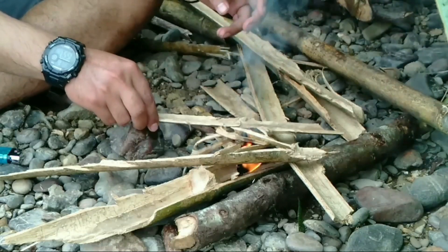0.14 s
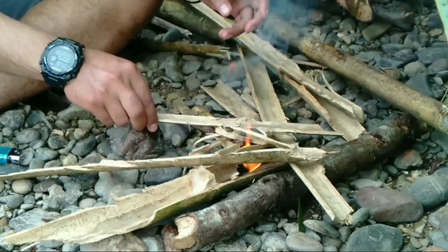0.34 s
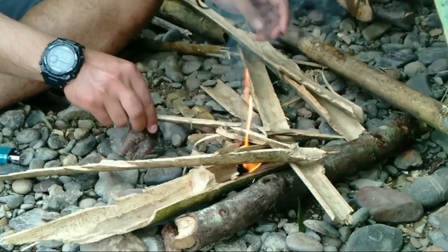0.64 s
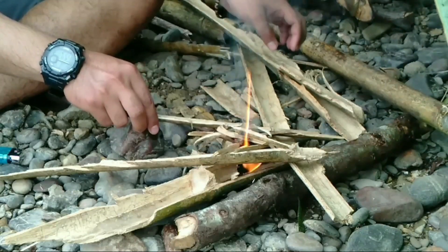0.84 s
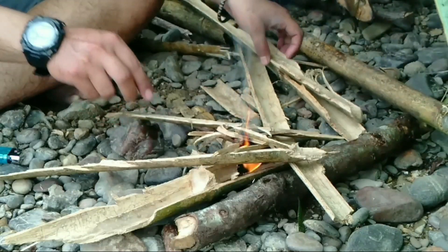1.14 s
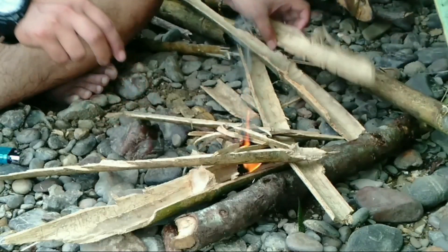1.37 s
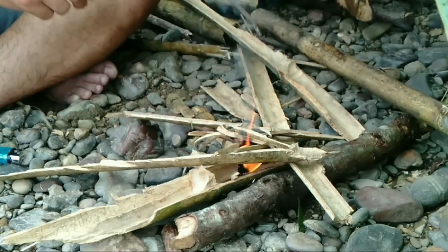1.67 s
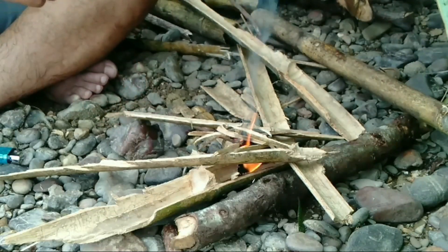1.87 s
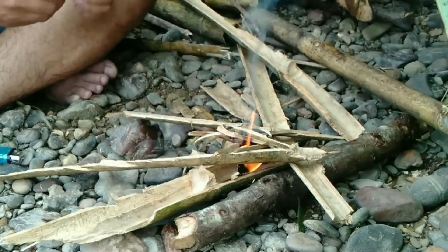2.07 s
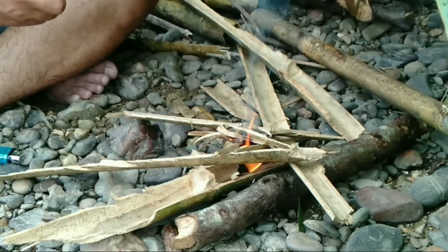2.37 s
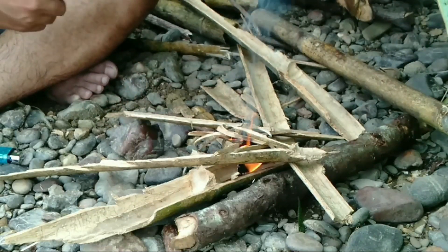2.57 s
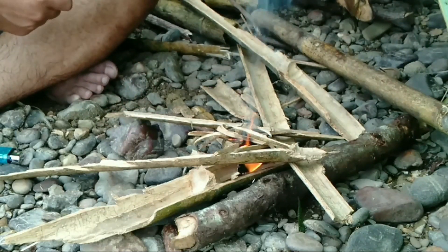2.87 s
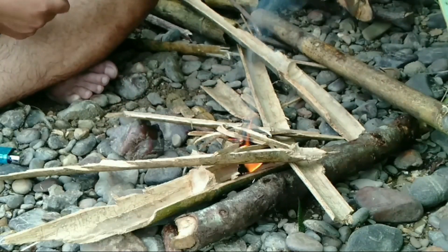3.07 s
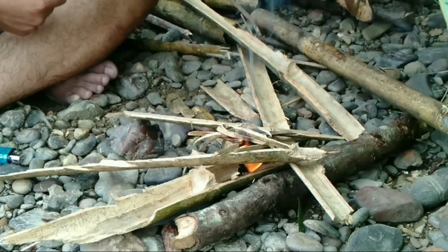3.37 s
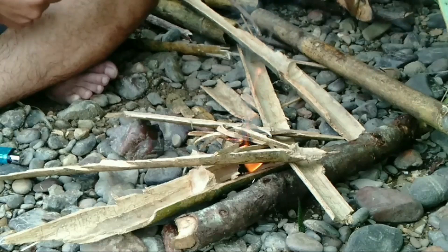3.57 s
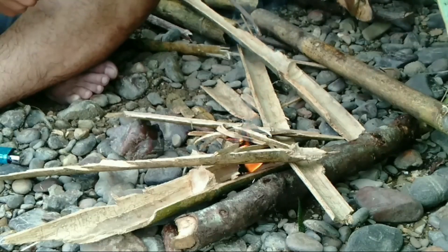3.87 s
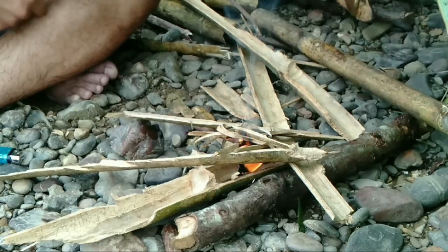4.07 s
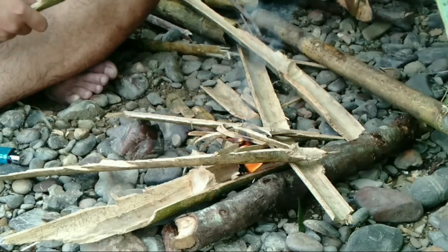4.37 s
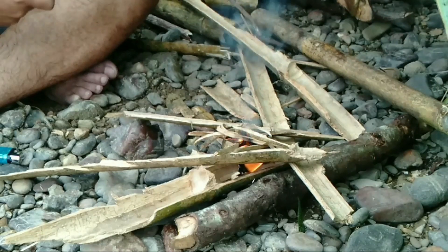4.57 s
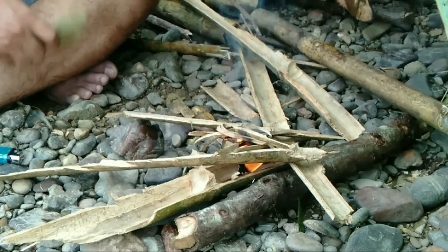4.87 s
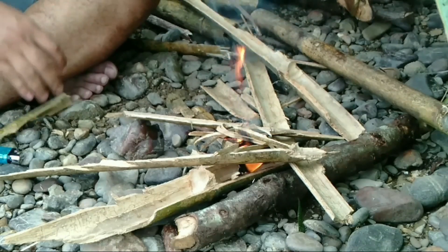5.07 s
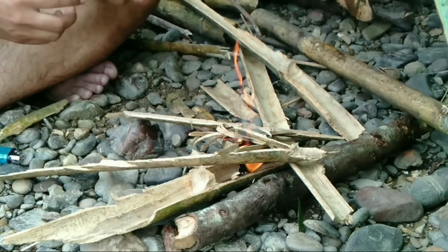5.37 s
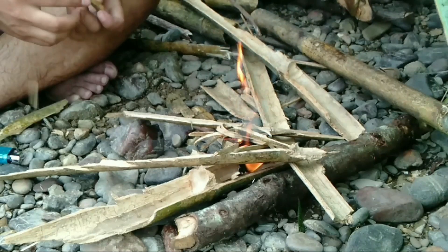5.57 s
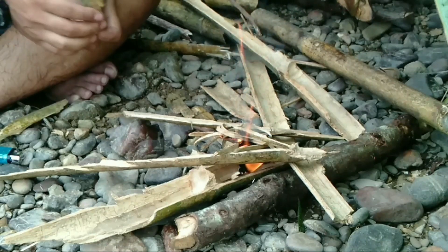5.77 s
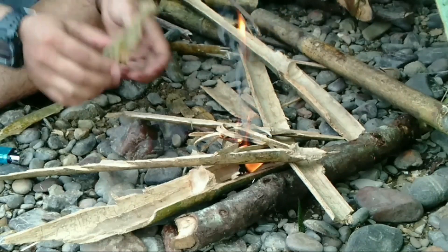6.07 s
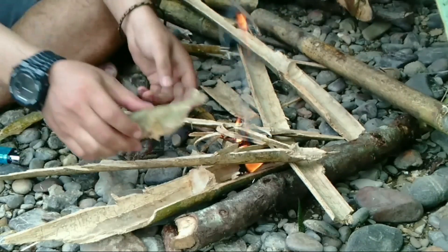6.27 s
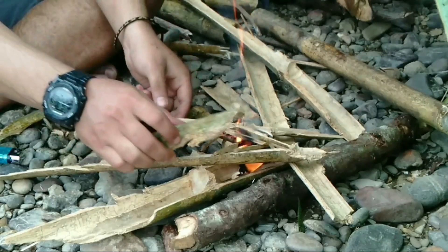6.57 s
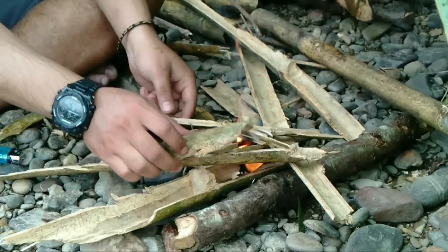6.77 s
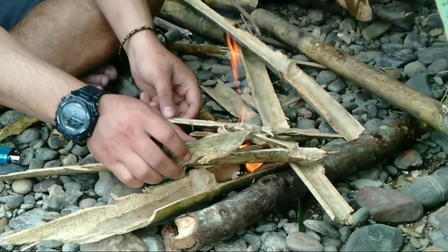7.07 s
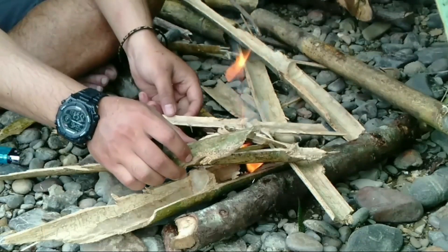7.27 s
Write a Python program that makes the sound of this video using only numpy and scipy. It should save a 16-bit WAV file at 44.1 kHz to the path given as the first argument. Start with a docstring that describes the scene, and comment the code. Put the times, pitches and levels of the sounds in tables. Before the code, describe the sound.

Quiet riverbank with shrill rasping and trilling crickets, sparse faint fire snaps, one sudden sharp pop, then small pebble knocks and thin bird calls.

```python
"""Riverbank fire with one loud pop

Split sticks tick faintly and pop once: noise bursts ring wood modes, and the pop adds thuds and a jolt.
A bush cricket rasps very high, as teeth pulses exciting a wing, over trilling tones and cricket noise bands.
Later birds call in swept tones, and a few pebbles knock with damped cosines and grit.
Shaped noise makes the river wash. After the pop the gain control holds everything down for a moment."""
import sys
import numpy as np
from scipy import signal
from scipy.fft import rfft, irfft
from scipy.io import wavfile
from scipy.ndimage import uniform_filter1d, minimum_filter1d

SR = 44100
rng = np.random.default_rng(int(sys.argv[2]) if len(sys.argv) > 2 else 0)


def wav_out(sig):
    """Save sig, one row per channel (or a flat mono array), as 16-bit PCM at SR to the path in sys.argv[1]."""
    wavfile.write(sys.argv[1], SR, np.round(np.clip(np.atleast_2d(sig).T, -1, 1) * 32767).astype(np.int16))


N = 328104

# Snaps of the burning wood: (time [s], relative level [dB], strongest region [Hz], splinter spray t60 [s])
SNAPS = [(.0768, -51.5, 1700, .018), (.918, -58.5, 1500, 0.033), (1.255, -50, 6900, 0.045),
         (1.263, -57, 5500, .03), (1.630, -57, 7000, .03), (1.651, -58, 2500, 0.027),
         (2.279, -58, 7000, 0.028), (2.323, -53, 6200, .025), (2.460, -58.5, 5000, 0.032),
         (2.957, -57, 7000, .02), (3.6998, -46.5, 7400, 0.016), (5.645, -62, 1900, .03),
         (6.5618, -55, 1900, .03)]
POP_S, POP_REL_DB = 4.1163, -6
# Modes of the split wood: (frequency [Hz], width [Hz], relative gain [dB])
WOOD_MODES = [(766, 250, 1), (1040, 220, -0.5), (1300, 220, 4), (1650, 150, -14), (1980, 440, 1),
              (2200, 200, -4), (2650, 590, -9.5), (3110, 280, -8), (4050, 740, -5), (5320, 420, 0),
              (6070, 350, -2.5), (6850, 350, 3), (7100, 320, 1.5), (8000, 1700, -9), (11050, 4500, -10.5),
              (14300, 1800, 0)]
# Low thud of the bursting pocket: (frequency [Hz], peak level [dB], t60 [s])
THUD_MODES = [(165.4, -31.5, 0.074), (457, -21.5, .018), (900, -8, 0.0056), (1260, -15.5, 0.0083)]
# Pebbles knocking as a leaf is picked up: (time [s], relative level [dB], main ring [Hz], t60 [s])
KNOCKS = [(5.1818, -41.5, 660, 0.029), (5.190, -51, 730, 0.017), (5.227, -45.5, 1160, 0.021),
          (5.236, -52.5, 2700, 0.0087), (5.239, -54, 1470, 0.018), (5.2605, -46, 755, 0.023),
          (5.259, -50.5, 1970, 0.046), (5.2755, -60, 1380, .025), (5.329, -50, 1310, 0.016)]
# Bush cricket's wing modes: (frequency [Hz], width [Hz], relative gain [dB])
WING_MODES = [(13900, 130, -18), (14000, 130, -25.5), (14140, 110, -13.5), (15040, 220, -4.5),
              (15270, 260, 8)]
# Even runs of chirps, with hesitations between: (first chirp [s], chirp period [s], chirps [count])
CHIRP_RUNS = [(.003, .230, 6), (1.361, 0.22, 4), (2.288, 0.27, 2), (2.866, .2665, 3), (3.636, 0.29, 2),
              (4.166, .257, 3), (4.974, .2745, 3), (5.885, 0.26, 2), (6.557, 0, 1), (6.881, .258, 2)]
CHIRP_REL_DB, CHIRP_SPREAD_DB = -49, 0.75
# Faltering of the double-pulse cricket: (from [s], to [s], probability of omitting a pair [0-1])
FALTERS = [(1.15, 1.68, .35), (1.68, 1.81, 1), (3.15, 3.55, .35), (6.65, 7.3, .35)]
# Single notes of a lower cricket, on a slow beat with random rests
NOTES_FROM_S, BEAT_S, NOTE_REL_DB, NOTE_SPREAD_DB = 4.451, .0608, -64.5, 1.5
# Near bird's "tsrip" calls: (end of call [s], relative level [dB])
TSRIPS = [(4.962, -52.5), (5.261, -55.5), (5.584, -55), (6.398, -62), (6.778, -60), (7.439, -61)]
# Upward sweeps of one call: (start before call end [s], length [s], from [Hz], to [Hz], relative level [dB])
SWEEPS = [(.049, 0.029, 5600, 7500, -12), (.042, 0.037, 2900, 8500, -4.5), (.026, .029, 3400, 8000, 0.5)]
# Far bird's falling whistles: (start [s], relative level [dB], extra on the closing drop [dB])
WHISTLES = [(5.165, -73.5, -6), (6.235, -72.5, 1), (7.035, -73, 1)]
# Whistle pips: swoop down onto one pitch, sag there, drop away at the end
PIP_S, HELD_HZ, SWOOP_HZ, SWOOP_S = .022, 5430, 1100, .033
SAG_HZ_PER_S, DROP_AT_S, DROP_HZ_PER_S = 550, .265, 17000
# Far crickets merged into steady bands: (centre [Hz], width per filter pass [Hz], rms level [dB])
CHORUS_BANDS = [(6780, 1100, -78), (7925, 490, -74), (8336, 280, -75.5), (11070, 880, -80.5)]
# River spectrum: (frequency [Hz], relative density [dB])
RIVER_SPECTRUM = [(12, -30), (20, 10), (27, -4), (70, 1.5), (197, -2.5), (287, -8.5), (737, -0.5),
                  (933, -5.5), (1330, -6.5), (1640, -10), (2400, -14), (2890, -14.5), (3490, -17.5),
                  (4640, -19.5), (5600, -25.5), (7280, -34.5), (12300, -120)]
# Hiss spectrum: (frequency [Hz], relative density [dB])
HISS_SPECTRUM = [(4000, -28), (5600, -5), (9500, -4.5), (13000, -5), (16000, -1)]
RIVER_DB, HISS_DB = -68.5, -71.5
BAND_EDGE_HZ = 15600


def gain_of(db):
    """Converts decibels to amplitude."""
    return 10 ** (np.asarray(db) / 20)


def unit_rms(x):
    """Scales to rms 1."""
    return x / np.sqrt(np.mean(x ** 2) + 1e-20)


def clock(seconds):
    """Returns sample times [s] over a duration."""
    return np.arange(int(seconds * SR)) / SR


def add(mix, start_s, sound):
    """Mixes a sound in at a start time."""
    part = mix[max(round(start_s * SR), 0):][:len(sound)]
    part += sound[:len(part)]


def tone(hz):
    """Makes a sine of rms 1 that follows a pitch curve."""
    cycles = np.cumsum(hz) / SR + rng.random()
    return np.sqrt(2) * np.sin(2 * np.pi * cycles)


def drift(rate_hz):
    """Makes random motion of rms 1 by Gaussian low-pass filtering of noise."""
    f = np.fft.rfftfreq(N, 1 / SR)
    lowpass = np.exp(-(f / rate_hz) ** 2) * (f > 0)
    return unit_rms(irfft(rfft(rng.standard_normal(N)) * lowpass, N))


def noise(spectrum):
    """Makes steady noise of rms 1, its spectrum interpolated over log frequency."""
    hz, db = np.transpose(spectrum)
    f = np.fft.rfftfreq(N, 1 / SR)
    shape = gain_of(np.interp(np.log(f + 1), np.log(hz + 1), db))
    return unit_rms(irfft(rfft(rng.standard_normal(N)) * shape, N))


def ring(x, modes):
    """Passes a sound through parallel resonances."""
    out = 0
    for hz, width_hz, db in modes:
        b, a = signal.iirpeak(min(hz, SR / 2 - 1), hz / width_hz, SR)
        out = out + gain_of(db) * signal.lfilter(b, a, x)
    return out


def highpass(x, edge_hz, order):
    """Removes the lows with a Butterworth filter."""
    return signal.sosfilt(signal.butter(order, edge_hz, "high", fs=SR, output="sos"), x)


def scatter(x, wet_db, t60_s):
    """Adds the diffuse echo of stones and trees as a decaying noise tail."""
    t = clock(.5)
    tail = rng.standard_normal(len(t)) * gain_of(-60 * t / t60_s) * (t > .003)
    return x + gain_of(wet_db) * signal.fftconvolve(x, tail / np.linalg.norm(tail))[:N]


def fracture(centre_hz, focus_db, t60_s, splinter_db):
    """One break and a dying spray of splinters ring the wood, weaker by focus_db per octave off centre."""
    t = clock(.12)
    force = gain_of(splinter_db - 60 * t / t60_s) * rng.standard_normal(len(t))
    force[0] -= 1
    modes = [(hz, width_hz, db - focus_db * abs(np.log2(hz / centre_hz))) for hz, width_hz, db in WOOD_MODES]
    sound = ring(force, modes)
    sound += ring(force, [(centre_hz, 0.57 * centre_hz, -13)])  # the break's own broad click
    sound = highpass(sound, 350, order=2)
    return 3 * sound / np.linalg.norm(sound)


def pop(after_rel_db=-8.5, jolt_rel_db=-6.8, swing_s=0.043, settle_s=0.051, rise_s=.00028):
    """A pocket of steam bursts; the blast jolts the microphone, which swings slowly back to rest."""
    out, t = np.zeros(N), clock(0.8)
    burst = fracture(4200, focus_db=2.2, t60_s=.012, splinter_db=-12)
    add(out, POP_S, gain_of(POP_REL_DB) * burst)
    after = fracture(6100, focus_db=1.6, t60_s=.066, splinter_db=-1.5)
    add(out, POP_S + 0.00094, gain_of(after_rel_db) * after)
    thud = sum(gain_of(db - 60 * t / t60_s) * np.sin(2 * np.pi * hz * t) for hz, db, t60_s in THUD_MODES)
    add(out, POP_S, -thud)
    jolt = (1 - t / swing_s) * np.exp(-t / settle_s) * (1 - np.exp(-t / rise_s))
    add(out, POP_S, -gain_of(jolt_rel_db) * jolt)
    return out


def fire(tick_rel_db=-64, ticks=40):
    """Burning wood breaks in timed snaps and in tiny ticks at random times."""
    out = np.zeros(N)
    for s, db, hz, t60_s in SNAPS:
        add(out, s, 2 * gain_of(db) * fracture(hz, focus_db=7.0, t60_s=t60_s, splinter_db=-12.0))
    for place, strength, colour in rng.random((ticks, 3)):
        tick = fracture(1500 + 7000 * colour, focus_db=6, t60_s=0.011, splinter_db=-7)
        add(out, place * N / SR, gain_of(tick_rel_db + 7.6 * strength ** 3) * tick)  # few strong ones
    return scatter(out, wet_db=-8, t60_s=0.14)


def bush_cricket(stroke_s=0.0224, closing_s=0.017, lead_s=.003, teeth_per_s=1500, opening_db=-13,
                 first_db=-4.0, swell_db=6, tiring_db_per_s=0.2, strokes=5):
    """Closing wings drag a file of teeth ever harder over a scraper, then reopen softly; five strokes a chirp."""
    effort = np.zeros(N)
    u = clock(closing_s) / closing_s
    stroke = signal.windows.tukey(len(u), .6) * gain_of(swell_db * (u - .5))
    chirp_times_s = [start + n * period for start, period, chirps in CHIRP_RUNS for n in range(round(chirps))]
    for s in chirp_times_s:
        chirp_db = CHIRP_REL_DB - tiring_db_per_s * s + rng.normal(0, CHIRP_SPREAD_DB)
        for k in range(strokes):
            level_db = chirp_db + first_db * (k == 0) + rng.normal(0, 1)
            add(effort, s - lead_s + k * stroke_s, gain_of(level_db) * stroke)
            add(effort, s - lead_s + (k + .5) * stroke_s, gain_of(level_db + opening_db) * stroke)
    tooth_rate = teeth_per_s * (1 + 0.13 * drift(400))
    teeth = np.diff(np.floor(np.cumsum(tooth_rate) / SR), prepend=0)  # one impulse a tooth
    teeth = teeth * gain_of(2 * drift(700))
    wing = highpass(ring(signal.unit_impulse(2048), WING_MODES), 13300, order=4)
    rasp = signal.fftconvolve(unit_rms(teeth) * effort, wing / np.linalg.norm(wing))[:N]
    return scatter(rasp, wet_db=-13.5, t60_s=0.18)


def pebbles(upper_db=-5, lower_db=-11, grit_db=-12):
    """Each knock is a short dull ring of three partials with a gritty scrape of filtered noise."""
    out, t = np.zeros(N), clock(.08)
    for s, db, hz, t60_s in KNOCKS:
        angle = 2 * np.pi * hz * t
        body = np.cos(angle)
        body -= gain_of(upper_db) * np.cos(1.405 * angle)
        body -= gain_of(lower_db) * np.cos(.52 * angle)
        grit = unit_rms(ring(rng.standard_normal(len(t)), [(hz * 0.83, 1300, 0)]))
        add(out, s, gain_of(db - 60 * t / t60_s) * (gain_of(grit_db) * grit - 0.74 * body))
    return scatter(out, wet_db=-6.5, t60_s=0.15)


def birds(crest_hz=6550, fade_db_per_octave=27):
    """One bird flicks three quick upward sweeps a call; a farther one draws out a quavering, falling whistle."""
    near, far = np.zeros(N), np.zeros(N)
    for s, db in TSRIPS:
        for lead_s, length_s, from_hz, to_hz, sweep_db in SWEEPS:
            u = clock(length_s) / length_s
            pitch_hz = from_hz + (to_hz - from_hz) * u ** 1.15 + 90 * drift(200)[:len(u)]
            # loudest where the sweep crosses the throat's resonance
            throat_db = -fade_db_per_octave * abs(np.log2(pitch_hz / crest_hz))
            swell = signal.windows.tukey(len(u), .4)
            add(near, s - lead_s, gain_of(db + sweep_db + throat_db) * swell * tone(pitch_hz))
    for s, db, drop_db in WHISTLES:
        add(far, s, whistle(db, drop_db))
    near = scatter(near, wet_db=-1, t60_s=0.04)  # nearby foliage blurs the sweeps
    near = gain_of(-2.2) * scatter(near, wet_db=-5, t60_s=0.38)
    return near + gain_of(-4.5) * scatter(far, wet_db=-1, t60_s=0.51)


def whistle(rel_db, drop_db, fade_in_db=-5, quaver_hz=60, pips=15):
    """A string of pips falls in pitch; each follows its own step of the curve, with a random quaver."""
    t = clock(pips * PIP_S)
    pip, within = np.divmod(t / PIP_S, 1)
    centre_s = (pip + .5) * PIP_S
    swoop = np.exp(-centre_s / SWOOP_S)
    dropping_s = np.maximum(centre_s - DROP_AT_S, 0)
    pitch_hz = HELD_HZ + SWOOP_HZ * swoop - SAG_HZ_PER_S * centre_s - DROP_HZ_PER_S * dropping_s
    pitch_hz += quaver_hz * drift(120)[:len(t)]
    level_db = rel_db + fade_in_db * swoop + drop_db * (dropping_s > 0) + 2 * drift(40)[:len(t)]
    return gain_of(level_db) * np.sin(np.pi * within) ** .5 * tone(pitch_hz)


def crickets(note_hz=7630, note_s=0.028, sag_hz=120, notes=24):
    """Trills and sagging single notes come from the bank, blurred by the undergrowth."""
    out = trill(hz=8253, rate_hz=16.4, rel_db=-71.0, fall_hz=109.5, duty=.6)
    out += trill(hz=8184, rate_hz=18.5, rel_db=-72, fall_hz=178.8, duty=.7)
    out += double_trill()
    u, waver_hz = clock(note_s) / note_s, 55 * drift(200)
    rests = rng.integers(1, 5, notes)  # beats to the next note
    for k, s in enumerate(NOTES_FROM_S + BEAT_S * (np.cumsum(rests) - rests)):
        pitch_hz = note_hz - sag_hz * (u - .5) + waver_hz[k * len(u):][:len(u)]
        level = gain_of(rng.normal(NOTE_REL_DB, NOTE_SPREAD_DB))
        add(out, s, level * np.sin(np.pi * u) * tone(pitch_hz))
    return scatter(out, wet_db=-11, t60_s=0.4)


def trill(hz, rate_hz, rel_db, fall_hz, duty):
    """A cricket trills evenly; the pitch sags as each wing stroke slows."""
    cycle = (np.cumsum(rate_hz * (1 + .02 * drift(2.95))) / SR + rng.random()) % 1
    stroke = np.minimum(cycle / duty, 1)
    song = np.sin(np.pi * stroke) * tone(hz - fall_hz * (stroke - .5) + 14 * drift(59.3))
    return gain_of(rel_db + 1.2 * drift(6.9)) * unit_rms(song)


def double_trill(hz=8890, rate_hz=25.5, gap_s=0.014, pulse_s=.0075, rise_hz=220, rel_db=-67, tiring_db_per_s=.3):
    """A higher cricket sings quick pairs of short rising pulses and drops whole pairs when it falters."""
    pair, cycle = np.divmod(np.cumsum(rate_hz * (1 + .03 * drift(4.6))) / SR, 1)
    since_s = cycle / rate_hz
    second = since_s > gap_s
    stroke = np.minimum((since_s - gap_s * second) / pulse_s, 1)
    pair_s = np.searchsorted(pair, pair) / SR  # start time of the current pair
    left_out = sum(share * (start <= pair_s) * (pair_s < end) for start, end, share in FALTERS)
    sung = rng.random(N)[pair.astype(int)] >= left_out
    level = sung * gain_of(rel_db - tiring_db_per_s * pair_s + 1.5 * second)
    return level * np.sin(np.pi * stroke) * tone(hz + rise_hz * (stroke - .5) + 30 * drift(40))


def chorus():
    """Many far crickets blur into narrow bands of twice-filtered noise."""
    out = np.zeros(N)
    for hz, width_hz, db in CHORUS_BANDS:
        band = [(hz, width_hz, 0)]
        out += gain_of(db) * unit_rms(ring(ring(rng.standard_normal(N), band), band))
    return out


def river():
    """Water washes over stones as gently drifting noise, with a thin even hiss above it."""
    wash = gain_of(RIVER_DB + 0.44 * drift(6)) * noise(RIVER_SPECTRUM)
    return wash + gain_of(HISS_DB) * noise(HISS_SPECTRUM)


def scene():
    """Sums the fire in front and the river, insects and birds around it."""
    front = pop() + fire() + bush_cricket() + pebbles()
    background = birds() + crickets() + chorus() + river()
    return (front + background)[None]


def record(dry, limit_db=-16.8, hold_s=0.275, recovery_db_per_s=50):
    """Gain control drops at once on a loud peak, holds, and recovers; then the band limit."""
    power_db = 10 * np.log10(abs(uniform_filter1d(dry[0] ** 2, size=128)) + 1e-12)
    half = int(hold_s * SR / 2)
    # running maximum over the past hold time
    over_db = -minimum_filter1d(-np.maximum(power_db - limit_db, 0), 2 * half + 1, origin=half)
    fall_db = np.arange(N) * recovery_db_per_s / SR
    ducked = dry / gain_of(np.maximum.accumulate(over_db + fall_db) - fall_db)
    lowpass = signal.firwin(401, BAND_EDGE_HZ, window=("kaiser", 8), fs=SR)
    return signal.oaconvolve(ducked, lowpass[None], "same")


dry = scene()
out = record(dry)
wav_out(out)
```